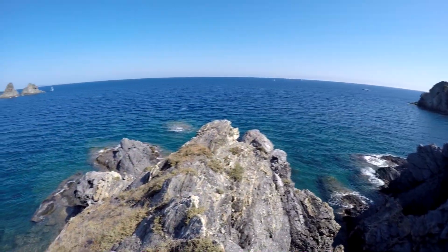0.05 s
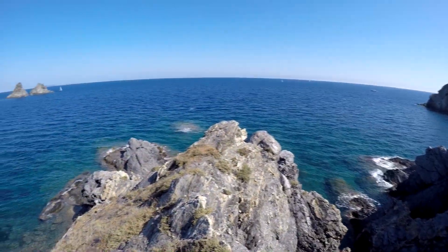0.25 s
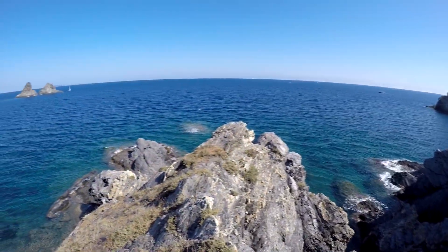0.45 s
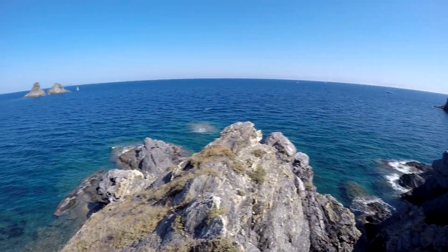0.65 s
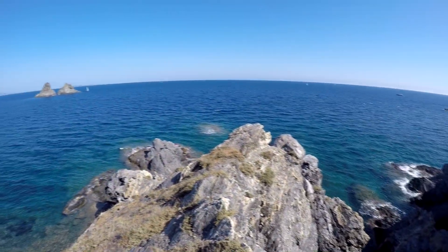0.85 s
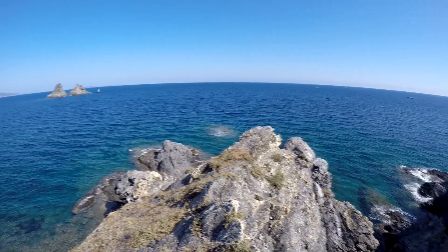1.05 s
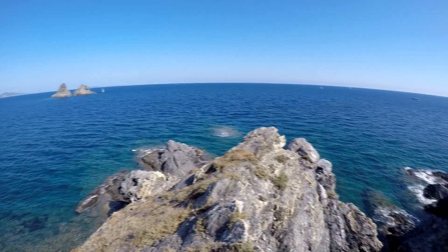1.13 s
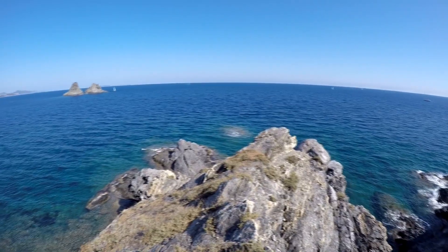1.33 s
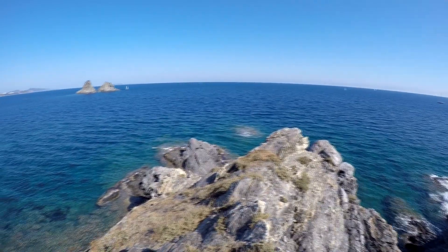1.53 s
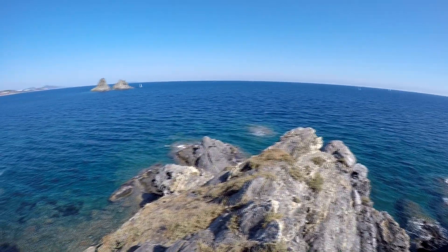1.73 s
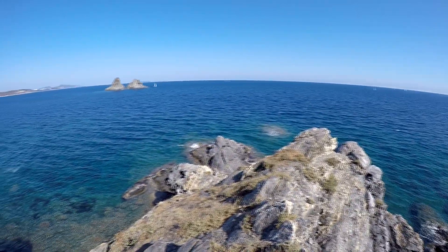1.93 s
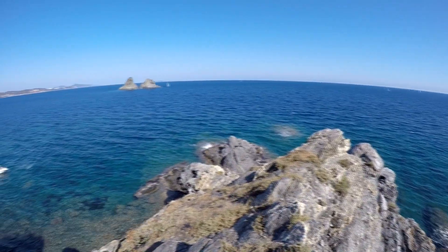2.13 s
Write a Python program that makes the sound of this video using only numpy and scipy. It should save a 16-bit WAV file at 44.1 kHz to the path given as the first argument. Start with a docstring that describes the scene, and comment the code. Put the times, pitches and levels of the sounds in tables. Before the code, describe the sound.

Footsteps on loose rock: one heavy thump, scattered stone knocks, grit scrapes, very faint distant sea wash

```python
"""Scramble over loose stone

Shoes scramble over loose stone on a steep hillside above the sea.
Stones knock with short dry clacks (noise and ringing modes), soles land with dull thuds (damped sines),
and grit scrapes underfoot (dense clicks through a band-pass). Far below, the sea is a faint steady wash
of noise. A dull echo follows the feet; the microphone cuts the deep bass and the top."""
import sys
import numpy as np
from scipy import signal
from scipy.fft import rfft, irfft
from scipy.io import wavfile

SR = 44100
rng = np.random.default_rng(int(sys.argv[2]) if len(sys.argv) > 2 else 0)


def transcribe(signal):
    """Save signal, clipped to [-1, 1], as a 16-bit WAV file at the path in sys.argv[1]."""
    frames = np.atleast_2d(signal).T
    limited = np.clip(frames, -1, 1)
    pcm = np.round(limited * 32767).astype(np.int16)
    wavfile.write(sys.argv[1], SR, pcm)


N = 97020
BLOW_S = np.arange(SR // 4) / SR   # time axis of one blow

# Stone knocks. Each row: start in seconds [s], ring t60 [s], attack time constant [s], the stone's two
# own notes [Hz], top edge [Hz], then the level in each knock band before the top edge is cut [dB].
STONE_KNOCKS = [(0.0005, 0.038, 0.00019, 478, 1240, 2360, -51, -54.5, -55.5, -65, -89),
                (0.126, 0.045, .0004, 3010, 5530, 7000, -61.5, -53.5, -51, -50.5, -65),
                (0.2111, 0.049, 0.00042, 1005, 2560, 6030, -48.5, -41.5, -38, -41.5, -54),
                (0.288, 0.027, 0.0013, 767, 1780, 2600, -63, -57, -55.5, -73, -65),
                (0.376, 0.068, 0.0023, 3450, 5050, 7320, -42, -51, -59, -60, -64.5),
                (0.3836, 0.026, 0.0055, 2676, 6400, 7300, -33, -47, -48.5, -47.5, -64.5),
                (0.5345, 0.04, 0.0018, 817, 3150, 7200, -44.5, -44, -62, -56.5, -71),
                (0.553, 0.036, 0.0011, 2680, 4760, 7060, -61.5, -59, -53.5, -54.5, -67.5),
                (0.6637, 0.055, 0.00033, 550, 2875, 5330, -43.5, -47, -50.5, -54.5, -63.5),
                (0.7857, 0.045, 0.00033, 1237, 3930, 4320, -65.5, -59.5, -50.5, -57, -67.5),
                (0.837, 0.042, 0.006, 588, 1184, 2395, -51.5, -57, -53, -80, -67),
                (0.8649, 0.05, 0.000097, 1230, 2336, 4740, -48, -38.5, -37.5, -44, -55.5),
                (0.970, 0.065, 0.00081, 1337, 1450, 2700, -63, -65, -53.5, -69, -56),
                (0.975, 0.028, 0.0015, 1360, 3846, 3900, -65, -53.5, -60.5, -53, -78),
                (1.04, 0.12, 0.0018, 727, 1124, 2960, -68, -67, -67, -77, -82),
                (1.171, 0.02, .0006, 800, 1200, 3100, -68, -74.5, -68.5, -76, -76),
                (1.267, 0.033, 0.00033, 1230, 3880, 4170, -61.5, -59.5, -51.5, -56, -79),
                (1.62, 0.015, 0.0003, 860, 1560, 3300, -71, -64.5, -62.5, -71.5, -90),
                (1.688, 0.041, 0.00081, 1200, 2480, 7800, -66.5, -63, -50.5, -50.5, -64.5),
                (2.044, 0.033, 0.00026, 1210, 3380, 7500, -63, -62, -61, -55.5, -65.5)]
# Edges of the knock bands, one column: frequency [Hz].
KNOCK_BAND_EDGES_HZ = [250, 620, 1100, 2100, 4300, 7500]
# Modes the stones ring with. Each row: frequency [Hz], level [dB], share of the knock's t60 [ratio].
STONE_RING_MODES = [(329.4, -1, 0.99), (427, -5.5, 1.2), (558, -6, 1.38), (733, -6.5, 1.82),
                    (882.3, 7, 1.03), (1005, -7, 2.3), (1198, -21, 3.3), (1293, 11.5, 0.4),
                    (1456, 8.5, 0.7), (1679, 4, 0.74), (1938, -5.5, 0.5), (2348, -11, .7),
                    (2560, 4.5, 0.66), (3550, 1.5, 0.2), (3872, 0, 0.54), (5710, -2.5, 0.17)]
# Weight coming down on a sole. Each row: start [s], level [dB], pitch [Hz], t60 [s],
# ground rumble relative to the sole [dB].
SOLE_THUDS = [(0.001, -43, 194, 0.05, -6), (0.215, -38.5, 234.4, 0.067, -15),
              (0.242, -37.5, 132, 0.062, -10), (0.3837, -14, 205.2, 0.071, -10),
              (0.3893, -17.5, 139, 0.07, -22), (0.418, -26, 122, 0.12, -19.5),
              (0.452, -36.5, 193, 0.071, -7), (0.535, -41, 141, 0.11, -16), (0.558, -41, 195, 0.077, -4.5),
              (0.604, -49.5, 316, 0.11, -12), (0.665, -24, 194.7, 0.081, -14.5),
              (0.688, -28.5, 132, 0.059, -9.5), (0.73, -44.5, 198, 0.045, -10.5),
              (0.867, -38.5, 170, 0.088, -13), (0.981, -41, 181, 0.048, -2.5),
              (1.2434, -32, 186, 0.14, -7.5), (1.268, -33, 189.6, 0.12, -12), (1.288, -35, 167, 0.052, -17),
              (1.623, -51, 139, 0.1, -10), (1.686, -47.5, 145, .07, -9)]
# Soles dragging over grit. Each row: start [s], length [s], level before the stroke shape [dB],
# centre [Hz], half-width [octaves].
GRIT_SCRAPES = [(0.011, 0.085, -53.5, 1240, 0.43), (0.141, .05, -57.5, 1250, 0.48),
                (0.149, 0.032, -69.5, 3750, .15), (0.356, 0.041, -56.5, 3330, 0.11),
                (0.358, 0.074, -50.5, 1020, 0.43), (0.49, 0.088, -52, 565, 0.5),
                (0.498, 0.056, -66.5, 3550, .08), (0.537, 0.012, -56, 4310, 0.046),
                (0.542, 0.027, -53, 3005, 0.035), (1.905, 0.21, -73.5, 3700, 0.46),
                (2.037, 0.064, -52, 1330, 0.39), (2.041, 0.057, -49, 3550, 0.22),
                (2.043, 0.046, -57.5, 5260, 0.18)]
# Spectrum shape of the sea. Each row: frequency [Hz], relative density [dB per Hz].
SEA_SPECTRUM = [(35, -69), (60, -24.5), (92, -2), (218, -0.5), (356, -8), (445, -9.5), (514, -7),
                (670, -13.5), (857, -8.5), (949, -11), (1210, -14), (2190, -14.5), (3300, -25),
                (6230, -33.5), (7960, -37.5), (10300, -82), (17500, -120)]
# Dips in the sound's colour. Each row: centre [Hz], width [Hz], gain at the centre [dB].
COLOUR_DIPS = [(2153, 220, -4), (4475, 690, -5.5)]

PITCH_SPREAD_RATIO, MODE_SPREAD_DB = 0.0098, 2.0   # standard deviations, drawn per mode and knock
CRACK_DB, CRACK_T60_S = 13.5, 0.018
RATTLE_DB, RATTLE_T60_SHARE, RATTLE_LOWPASS_HZ = 4.5, 1.396, 2040
OWN_NOTE_DB, OWN_T60_SHARE, OWN_SPLIT_RATIO = 7, 0.7, 0.041   # each own note is a pair, split both ways
LEVEL_WINDOW_S = 0.02   # band energy is spread over this time to set its level
THUD_ATTACK_S, EARTH_LOWPASS_HZ, EARTH_T60_S = 0.0016, 320, 0.087
SCRAPE_RISE_SHARE, SCRAPE_SHAPE_POWER = 0.12, 1.24
GRAINS_PER_S, GRAIN_SPREAD_DB = 3000, 2
ECHO_DB, ECHO_T60_S, ECHO_LOWPASS_HZ, ECHO_BUILD_S = -21, 0.17, 1450, 0.018
SEA_DB, SEA_FLICKER_RMS_DB, SEA_FLICKER_LOWPASS_HZ = -62, 0.5, 7
BASS_STOP_HZ, BASS_STOP_DB, TREBLE_LOWPASS_HZ, CUTOFF_HZ = 87.5, 31, 7000, 8118


def from_db(db):
    """Decibels to gain."""
    return 10 ** (np.asarray(db) / 20)


def rms_one(x):
    """Scale to unit rms."""
    return x / np.sqrt(np.mean(x ** 2) + 1e-20)


def dying(t60_s):
    """Exponential decay over one blow."""
    return np.exp(-np.log(1000) * BLOW_S / t60_s)


def rising(attack_s):
    """Exponential onset over one blow."""
    return 1 - np.exp(-BLOW_S / attack_s)


def blow_noise():
    """White noise as long as one blow."""
    return rng.standard_normal(len(BLOW_S))


def filtered(x, hz, kind, order=2):
    """Butterworth filter."""
    hz = np.clip(hz, 10, SR / 2 - 10)
    return signal.sosfilt(signal.butter(order, hz, kind, fs=SR, output="sos"), x)


def add(out, start_s, x):
    """Mix x into out at start_s."""
    i = max(int(start_s * SR), 0)
    out[i:i + len(x)] += x[:N - i]


def stone_ring(t60_s, own_notes_hz):
    """Damped sines: the shared stone modes plus a split pair for each of the stone's own notes."""
    modes = list(STONE_RING_MODES)
    for note_hz in own_notes_hz:
        for side in (-1, 1):
            modes.append((note_hz * (1 + side * OWN_SPLIT_RATIO), OWN_NOTE_DB, OWN_T60_SHARE))
    ring = np.zeros(len(BLOW_S))
    for hz, db, t60_share in modes:
        detune, strength = rng.standard_normal(2)
        turns = hz * (1 + PITCH_SPREAD_RATIO * detune) * BLOW_S + rng.random()
        gain = from_db(db + MODE_SPREAD_DB * strength)
        ring += gain * np.sin(2 * np.pi * turns) * dying(t60_s * t60_share)
    return ring


def level_bands(x, levels_db):
    """Set the energy of x band by band."""
    out = np.zeros(len(x))
    edges = zip(KNOCK_BAND_EDGES_HZ, KNOCK_BAND_EDGES_HZ[1:])
    for db, band_hz in zip(levels_db, edges):
        band = filtered(x, band_hz, "band", order=4)
        out += from_db(db) * band / np.sqrt(np.sum(band ** 2) / (LEVEL_WINDOW_S * SR))
    return out


def knocks():
    """A contact crack, the ringing stone and the dense rattle of rubble around it, levelled by band."""
    out = np.zeros(N)
    for start_s, t60_s, attack_s, note_hz, overtone_hz, top_hz, *levels_db in STONE_KNOCKS:
        crack = from_db(CRACK_DB) * blow_noise() * dying(CRACK_T60_S)
        rubble = rms_one(filtered(blow_noise(), RATTLE_LOWPASS_HZ, "low"))
        rattle = from_db(RATTLE_DB) * rubble * dying(t60_s * RATTLE_T60_SHARE)
        ring = stone_ring(t60_s, (note_hz, overtone_hz))
        knock = level_bands((crack + rattle + ring) * rising(attack_s), levels_db)
        add(out, start_s, filtered(knock, top_hz, "low", order=8))
    return out


def thuds():
    """A sole's damped low note with a short rumble of the ground under it."""
    out = np.zeros(N)
    for start_s, db, hz, t60_s, earth_db in SOLE_THUDS:
        sole = np.sin(2 * np.pi * hz * BLOW_S) * dying(t60_s)
        rumble = rms_one(filtered(blow_noise(), EARTH_LOWPASS_HZ, "low", order=3))
        earth = from_db(earth_db) * rumble * dying(EARTH_T60_S)
        add(out, start_s, from_db(db) * (sole + earth) * rising(THUD_ATTACK_S))
    return out


def scrapes():
    """Dense tiny grit clicks ring the pebbles, swelling and fading under a sliding sole."""
    out = np.zeros(N)
    count = len(BLOW_S)
    for start_s, length_s, db, hz, octaves in GRIT_SCRAPES:
        sizes_db = GRAIN_SPREAD_DB * np.minimum(rng.exponential(1, count), 4)
        clicks = from_db(sizes_db) * rng.choice([-1, 1], count)
        grit = clicks * (rng.random(count) < GRAINS_PER_S / SR)
        pebbles = rms_one(filtered(grit, [hz / 2 ** octaves, hz * 2 ** octaves], "band"))
        stroke = np.interp(BLOW_S / length_s, [0, SCRAPE_RISE_SHARE, 1], [0, 1, 0])
        add(out, start_s, from_db(db) * stroke ** SCRAPE_SHAPE_POWER * pebbles)
    return out


def rock_echo(x):
    """Faint dull scatter from the rocks: convolution with a decaying noise tail, then a low-pass."""
    tail = blow_noise() * dying(ECHO_T60_S) * rising(ECHO_BUILD_S)
    scatter = signal.fftconvolve(x, tail / np.linalg.norm(tail))[:N]
    return from_db(ECHO_DB) * filtered(scatter, ECHO_LOWPASS_HZ, "low")


def sea():
    """Distant wash: shaped noise in octave bands that flicker slightly, each on its own."""
    hz = np.fft.rfftfreq(N, 1 / SR) + 1   # +1 avoids log(0)
    points_hz, points_db = np.array(SEA_SPECTRUM).T
    shape_db = np.interp(np.log(hz), np.log(points_hz), points_db)
    wash = rfft(rng.standard_normal(N)) * from_db(shape_db)
    octave = np.clip(np.log2(hz).astype(int), 6, 12)   # the end bands take in all beyond them
    out = np.zeros(N)
    for k in np.unique(octave):
        flicker = rms_one(filtered(rng.standard_normal(N), SEA_FLICKER_LOWPASS_HZ, "low"))
        out += irfft(wash * (octave == k), N) * from_db(SEA_FLICKER_RMS_DB * flicker)
    return from_db(SEA_DB) * rms_one(out)


def scene():
    """Footfalls close by, over the far sea."""
    feet = knocks() + thuds() + scrapes()
    return (feet + rock_echo(feet) + sea())[None]


def record(dry):
    """Microphone: a steep bass cut, two dips in the colour, a treble low-pass and a steep final low-pass."""
    bass_cut = signal.cheby2(9, BASS_STOP_DB, BASS_STOP_HZ, "high", fs=SR, output="sos")
    x = signal.sosfilt(bass_cut, dry)
    for hz, width_hz, db in COLOUR_DIPS:
        peak_b, peak_a = signal.iirpeak(hz, hz / width_hz, fs=SR)
        x = x + (from_db(db) - 1) * signal.lfilter(peak_b, peak_a, x)
    x = filtered(x, TREBLE_LOWPASS_HZ, "low", order=6)
    top_cut = signal.ellip(10, 0.2, 70, CUTOFF_HZ, fs=SR, output="sos")   # 0.2 dB ripple, 70 dB stop
    return signal.sosfilt(top_cut, x)


dry = scene()
out = record(dry)
transcribe(out)
```